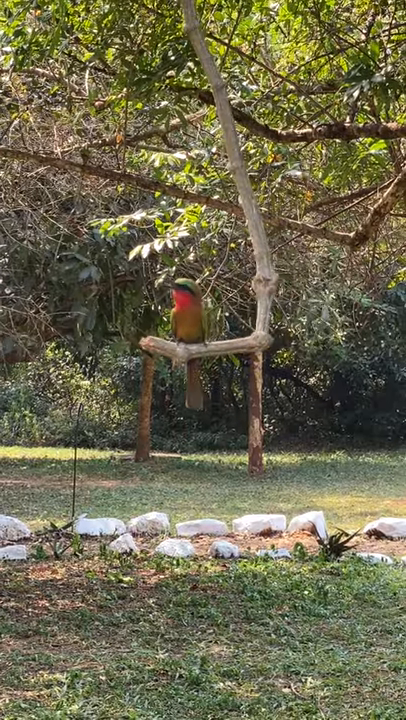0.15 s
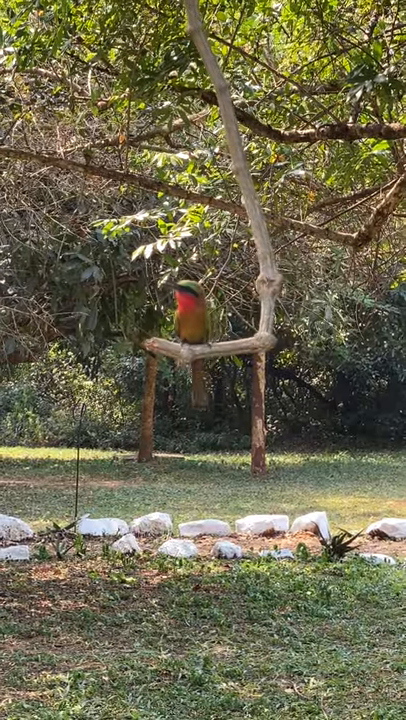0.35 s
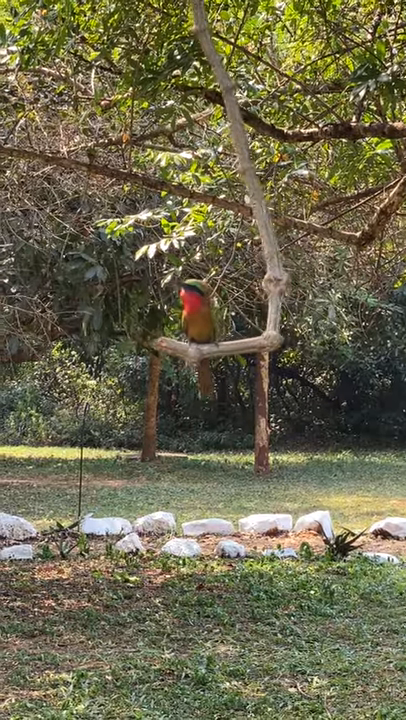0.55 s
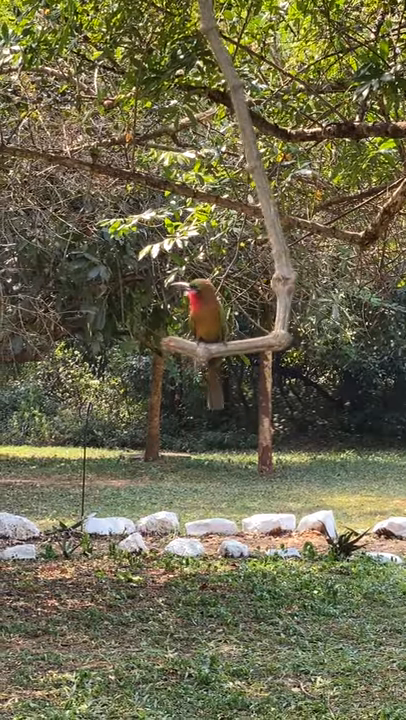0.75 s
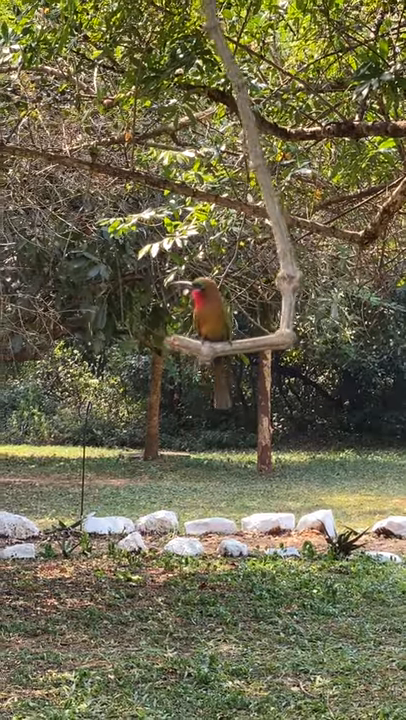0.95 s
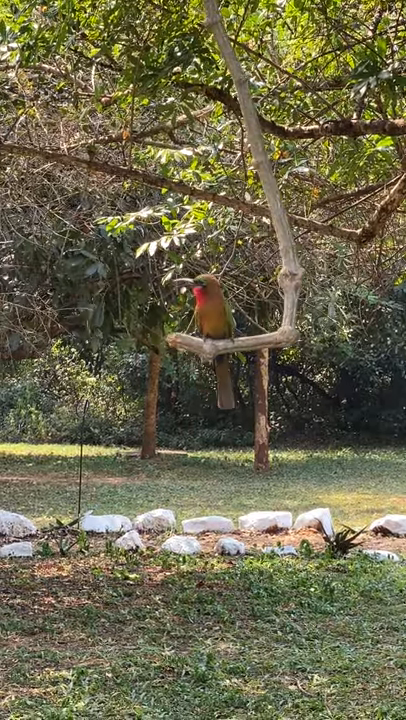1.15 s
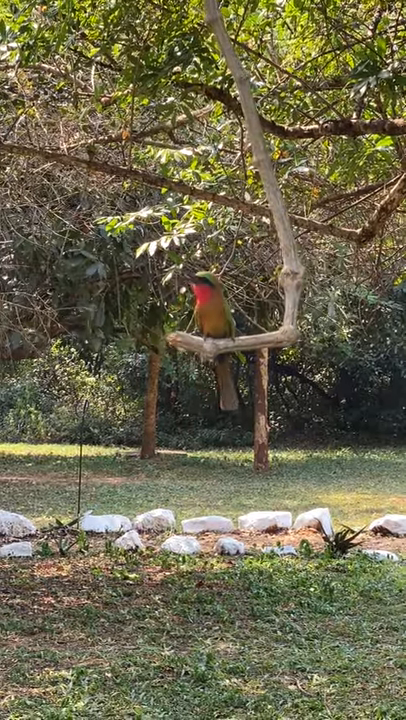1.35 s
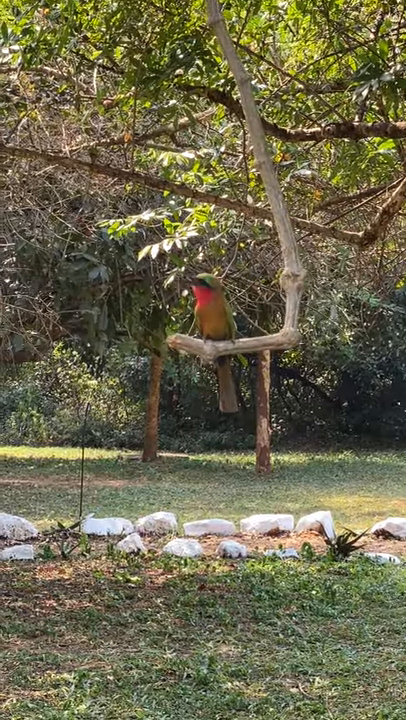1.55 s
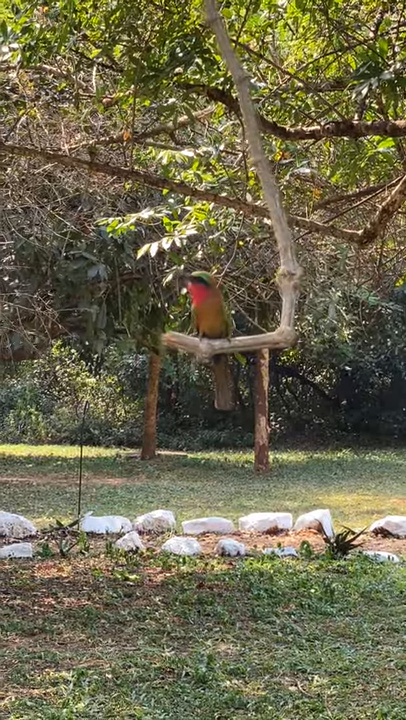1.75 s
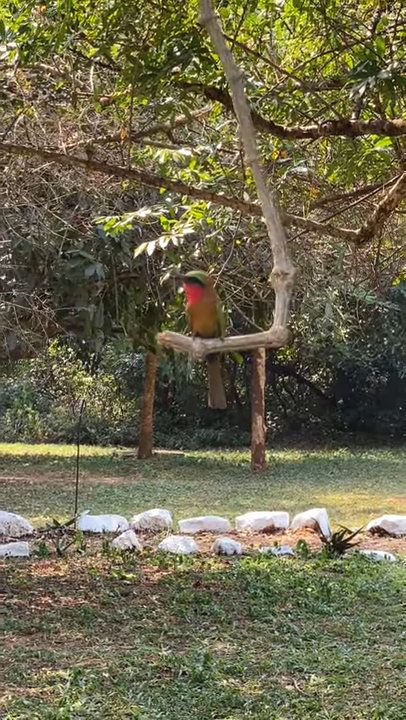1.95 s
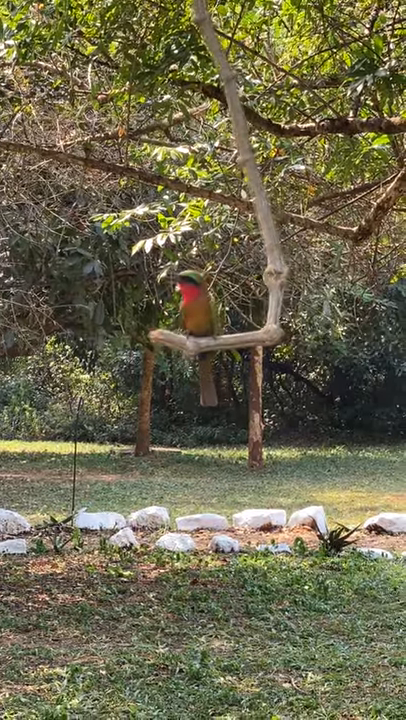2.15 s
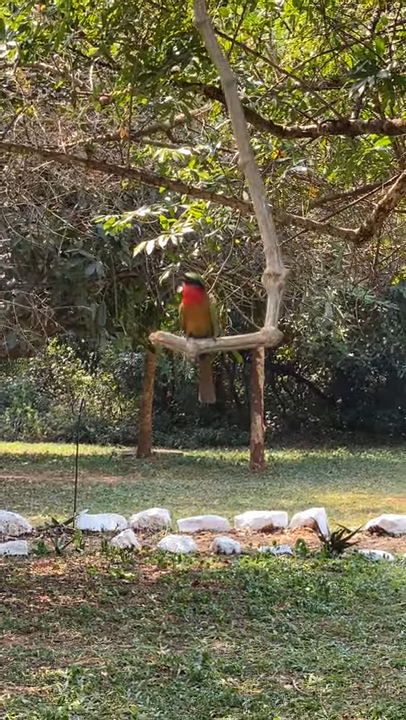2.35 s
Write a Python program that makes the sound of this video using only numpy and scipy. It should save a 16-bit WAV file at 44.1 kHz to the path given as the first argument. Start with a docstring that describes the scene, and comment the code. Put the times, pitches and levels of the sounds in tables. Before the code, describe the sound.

A perched bird calls in a quiet garden: from 0.4 to 0.55 s a rapid, burry four-part trill, then at about 1.75 s one softer, clean note arching up and down for a little over a tenth of a second. Faint far birds whistle and rattle throughout, busier after 1.4 s. Tiny clicks fall near 0.55, 1.07 and 1.39 s. Low idling engines throb under soft air noise; trees add short echoes.

```python
"""Garden with birds, heard by two microphone ports. Throughout, two idling engines drone as steady tones
that beat, under soft coloured noise, while far birds whistle and rattle: gliding tones blurred by echoes.
From 0.4 s a near perched bird gives a four-part trill, and from 1.75 s one arched note: harmonics coloured
by throat and beak, which the trill breaks into strong-weak pulses. Snaps, as damped clicks, fall at 0.55,
1.07 and 1.39 s. Trees scatter the bird sounds into random tails."""
import sys
import numpy as np
from scipy import signal
from scipy.fft import rfft, irfft, next_fast_len
from scipy.io import wavfile
from scipy.ndimage import uniform_filter1d

SR = 44100
rng = np.random.default_rng(int(sys.argv[2]) if len(sys.argv) > 2 else 0)


def put_to_file(sound):
    """Save the sound as 16-bit audio at rate SR, in the file named by the first command-line argument."""
    columns = np.atleast_2d(sound).T  # one column per channel
    safe = np.clip(columns, -1, 1)
    whole_steps = np.round(safe * 32767)
    wavfile.write(sys.argv[1], SR, whole_steps.astype(np.int16))


N = 110250
T = np.arange(N) / SR  # time in s


def gain_of(db):
    """Turns decibels into an amplitude factor."""
    return 10 ** (np.asarray(db) / 20)


def evened(x):
    """Scales a signal to rms 1."""
    return x / np.sqrt(np.mean(x ** 2) + 1e-20)


def read(points, hz):
    """Reads a curve of (f/Hz, value) points, with straight lines over log frequency."""
    f, value = np.transpose(points)
    return np.interp(np.log(hz + 1), np.log(f + 1), value)


def wobble(size):
    """Smooth random wavering of rms 1; a larger size (samples) wavers more slowly."""
    smoothed = uniform_filter1d(rng.standard_normal(N), size)
    return evened(uniform_filter1d(smoothed, size))


def noise(spectrum, patchy_db):
    """Coloured noise of rms 1, whose level drifts in patches over time and frequency."""
    frames, hz = N // 256 + 5, np.fft.rfftfreq(1024, 1 / SR)
    real, imaginary, patches = rng.standard_normal((frames, 513, 3)).T
    patches = uniform_filter1d(patches, 8, 0)  # smooth over frequency
    patches = evened(uniform_filter1d(patches, 14, 1))  # smooth over time
    level_db = read(spectrum, hz)[:, None] + patchy_db * patches
    grid = (real + 1j * imaginary) * gain_of(level_db)
    return evened(signal.istft(grid, nperseg=1024, noverlap=768)[1][:N])


def ports(x):
    """Makes two channels by turning the phase of each frequency apart between the ports."""
    # Phase by which left leads right: (f/Hz, phase/rad)
    port_phase = [(100, -3), (1500, 0.16), (2700, 0.58), (4100, 0.86), (4500, 1.5), (6000, 1.34),
                  (7400, 3.5), (8100, 3), (8500, np.pi), (11700, np.pi), (13300, 4.5), (15000, 5)]
    size = next_fast_len(N + 2048)
    half_turn = read(port_phase, np.fft.rfftfreq(size, 1 / SR)) / 2
    turns = np.exp(1j * np.array([half_turn, -half_turn]))
    return irfft(rfft(x, size) * turns, size)[:, :N]


def echoes(x, t60, gap_s, treble_share=0.68):
    """Scatter from trees: a dying random tail, mostly alike in both ports; its treble dies sooner."""
    treble_hz, fade_in_s = 4500, 0.0045
    differing, differing_top_hz = 0.45, 7000  # amplitude share that differs between ports, and its top
    t = np.arange(SR) / SR
    tails = rng.standard_normal((3, SR))
    low = signal.sosfiltfilt(signal.butter(N=2, Wn=treble_hz, fs=SR, output='sos'), tails)
    low_tail = low * gain_of(-60 * t / t60)
    treble_tail = (tails - low) * gain_of(-60 * t / t60 / treble_share)
    tails = (low_tail + treble_tail) * np.clip((t - gap_s) / fade_in_s, 0, 1)
    wet = signal.fftconvolve(x[None], tails / np.linalg.norm(tails[0]), axes=1)[:, :N]
    top_cut = signal.butter(N=6, Wn=differing_top_hz, fs=SR, output='sos')
    alike = np.sqrt(1 - differing ** 2) * ports(wet[0])
    return alike + differing * signal.sosfilt(top_cut, wet[1:])


def air():
    """Soft noise, the same in both ports."""
    # Colour of the noise: (f/Hz, relative level per Hz/dB)
    air_colour = [(25, -28.5), (45, -13.5), (77, -7.5), (100, -18.5), (130, -17.5), (194, -18.5),
                  (230, -25), (437, -27.5), (739, -34), (1630, -40), (2170, -43), (2600, -49), (3500, -55),
                  (5000, -63.5), (7500, -68), (9000, -77.5), (16000, -83.5)]
    return gain_of(-59.5) * noise(air_colour, patchy_db=0.5)


def hiss():
    """Soft noise, opposite in the two ports."""
    # Colour of the noise: (f/Hz, relative level/dB)
    hiss_colour = [(18, -73), (30, -49), (124, -5.5), (210, -2), (239, -10.5), (311, -0.5), (512, 2),
                   (1900, -16), (2230, -14), (3300, -38.5), (5030, -26.5), (5440, -27.5), (16000, -38)]
    one_side = gain_of(-72) * noise(hiss_colour, patchy_db=1.0)
    return np.array([one_side, -one_side])


def engines():
    """Steady low tones of two idling engines, which beat where they lie close, and a faint fuzzy whine."""
    # First engine, tones at multiples of its cycle rate: (multiple, mean level/dB rms)
    first_engine = [(3, -57.5), (4, -72), (5, -79), (6, -53), (7, -63), (8, -73.5), (10, -71.5), (11, -78),
                    (12, -70), (16, -69.5)]
    # Second engine: (f/Hz, mean level/dB rms)
    second_engine = [(52.0, -64), (75.8, -56)]
    cycle_hz, waver_db = 11.8, 1.5
    together_s = 1.005  # the moment at which all engine tones are in step
    whine_hz, whine_width_hz, whine_db = 1603, 35, -79  # the width is approximate
    tones = [(k * cycle_hz, db) for k, db in first_engine] + second_engine
    drone = np.zeros(N)
    for hz, db in tones:
        level = gain_of(db + waver_db * wobble(size=5000))
        drone += level * np.cos(2 * np.pi * hz * (T - together_s))
    # Two waves a quarter turn apart, each wavering at random, blur the whine
    whine = np.zeros(N)
    for wave in (np.sin, np.cos):
        whine += wobble(size=int(SR / whine_width_hz / 3)) * wave(2 * np.pi * whine_hz * T)
    return np.sqrt(2) * drone + gain_of(whine_db) * whine


def far_birds():
    """Thin gliding whistles at a distance: row 0 is the direct sound, row 1 feeds the echoes."""
    # Calls that glide to a turning pitch, then on to an end pitch; levels are those before the second glide:
    # (t/s, first glide/s, second glide/s, start f/Hz, turning f/Hz, end f/Hz, direct level/dB, echo level/dB)
    far_calls = [(0, .035, .01, 5300, 6050, 5500, -74, -82), (0, 0.033, .03, 6850, 7200, 6900, -81, -88),
                 (.3, .03, .06, 2150, 2320, 2200, -78, -76), (1.04, .02, .085, 2400, 2450, 1750, -79, -75),
                 (1.01, .03, .05, 1620, 1720, 1670, -76, -78),
                 (1.563, .012, .06, 3350, 3550, 3350, -67, -67),
                 (.29, .03, .04, 2700, 2775, 2750, -83.5, -84.5),
                 (.68, .03, .125, 4250, 4530, 4150, -77, -77), (.21, .01, .075, 2400, 2400, 1980, -78, -82),
                 (1.156, 0.029, 0.043, 6500, 7000, 5160, -84, -76),
                 (1.2, .02, 0.27, 1500, 1502, 944, -76, -76),
                 (1.304, 0.028, 0.031, 3230, 3360, 1975, -82, -73),
                 (1.368, .05, .032, 5120, 5460, 3140, -62, -64.5),
                 (1.385, .045, 0.038, 7220, 7560, 5200, -74, -65),
                 (1.5, 0.012, .16, 2870, 2580, 1900, -63.5, -64),
                 (1.538, 0.0033, 0.021, 4000, 3900, 2600, -70, -65),
                 (1.49, 0.014, 0.023, 5200, 5300, 3500, -87, -73.5),
                 (1.791, 0.025, 0.051, 6300, 6640, 4800, -74, -64.5),
                 (2.155, 0.02, 0.05, 3900, 4050, 3950, -82, -82),
                 (1.572, 0.02, .04, 6600, 6950, 6300, -90, -76),
                 (1.904, 0.0097, 0.065, 4360, 4500, 4210, -72, -71),
                 (1.98, 0.036, 0.041, 6500, 6780, 4700, -80, -69),
                 (2.225, .06, .027, 6290, 6980, 3800, -75, -66),
                 (2.35, 0.037, 0.063, 1555, 1666, 1684, -76, -87),
                 (2.37, .05, 0.023, 2590, 3050, 3030, -80, -79.5),
                 (2.472, 0.042, .01, 3410, 4150, 4200, -73.5, -73),
                 (2.478, 0.035, .01, 2400, 3125, 3100, -70.5, -72.5),
                 (2.47, 0.033, .01, 1790, 2120, 2100, -73, -77),
                 (1.93, .03, .03, 387, 397.6, 397, -63, -77),
                 (2.119, 0.024, 0.035, 492, 509, 504, -64, -73),
                 (2.26, 0.033, 0.07, 420, 400, 338, -64, -74)]
    edge_s = .006  # fade-out time; the fade-in takes twice as long
    fall_db = -4  # weakening over the second glide
    sweep_full_db, sweep_hz_per_s = -12, 40000  # quick falls weaken the direct sound further
    warble = .03  # share of pitch by which a fully blurred call sags at random (rms)
    flutter = 0.5  # from leaves and moving air, more where echoes outweigh the direct sound
    out = np.zeros((2, N))
    for start, rise, fall, from_hz, top_hz, to_hz, direct_db, echo_db in far_calls:
        t = T - start
        up, down = np.clip(t / rise, 0, 1), np.clip((t - rise) / fall, 0, 1)
        hz = from_hz + (top_hz - from_hz) * np.sin(np.pi / 2 * up) + (to_hz - top_hz) * down
        blur = min(flutter * gain_of(echo_db - direct_db), 1)
        hz = hz * (1 - warble * blur * abs(wobble(size=250)))
        edges = np.clip(np.minimum(t / 2, rise + fall - t) / edge_s, 0, 1)
        shape = gain_of(fall_db * down) * edges * (1 + blur * wobble(size=170))
        quickness = np.tanh((top_hz - to_hz) / fall / sweep_hz_per_s)
        sweep_db = sweep_full_db * quickness * np.sqrt(down)
        levels = gain_of([direct_db + sweep_db, echo_db + 0 * down])
        out += levels * np.sqrt(2) * shape * np.sin(2 * np.pi * np.cumsum(hz) / SR)
    return out


def rattles():
    """Quick runs of chips at a distance, each chip falling in pitch; rows as for the far birds."""
    # One list for each run: (t/s, f at the start of a chip/Hz, peak level of direct sound/dB)
    runs = [
        [(1.98, 3200, -71.5), (2.01, 3450, -58.5), (2.1, 3400, -67), (2.2, 3050, -68.5), (2.3, 2600, -79.5),
         (2.36, 2300, -76)],
        [(2.1, 2300, -80), (2.16, 2100, -75.5), (2.25, 1900, -71), (2.33, 1800, -82)],
        [(1.04, 2500, -79), (1.1, 2600, -73), (1.17, 2200, -80)],
        [(1.54, 3900, -72), (1.6, 3800, -70), (1.68, 3500, -81.5), (1.74, 3300, -84)],
    ]
    chips_per_s, chip_drop, echo_boost_db = 53, .35, 4  # the drop is a share of the pitch
    out = np.zeros(N)
    for rows in runs:
        s, top_hz, db = np.transpose(rows)
        rate = chips_per_s * (1 + 0.12 * wobble(size=900))
        progress = (np.cumsum(rate) / SR) % 1  # from 0 to 1 within each chip
        hz = np.interp(T, s, top_hz) * (1 - chip_drop * progress)
        chips = np.sin(np.pi * progress) * np.sin(2 * np.pi * np.cumsum(hz) / SR)
        out += chips * gain_of(np.interp(T, s, db, -200, -200))
    return gain_of([[0], [echo_boost_db]]) * out


def snaps():
    """Short clicks: tones that swell and die at once, sooner when wider; rows as for the far birds."""
    # Clicks: (t/s, f/Hz, width/Hz, direct level of the envelope peak/dB, echo level of it/dB)
    clicks = [(1.073, 6650, 4300, -46.5, -50), (.553, 880, 160, -57.5, -75), (1.39, 7600, 1500, -72, -60)]
    out = np.zeros((2, N))
    for s, hz, width, direct_db, echo_db in clicks:
        u = np.maximum(T - s, 0) * np.pi * width
        envelope = u ** 2 * np.exp(2 - u) / 4
        out += gain_of([[direct_db], [echo_db]]) * envelope * np.sin(2 * np.pi * hz * (T - s))
    return out


def garden(near):
    """Echoes of the near bird: a short early scatter and a weaker, longer late one."""
    early = gain_of(-16) * echoes(near, t60=0.18, gap_s=0.002)
    return early + gain_of(-26.5) * echoes(near, t60=0.47, gap_s=.03)


def bird(rows, tilt_db, glide_db, dip_hz, dip_end_s):
    """A stack of harmonics through the throat; half-pitch lines and breath grow in the breaks."""
    # Colour of throat and beak: (f/Hz, gain/dB)
    throat = [(600, -40.5), (1000, -5.5), (1450, -10), (2200, -4), (2900, -2), (3700, -2.5), (4400, -9),
              (5200, -19), (6000, -24.5), (7400, -28), (8800, -34), (10400, -36.5), (12000, -54),
              (13400, -40), (14600, -30), (15300, -40), (16000, -64)]
    jitter, break_jitter = .004, .018  # rms share of pitch, and what a full break adds
    breathy_db, break_breathy_db, breath_tilt_db = -30, -13, 28  # the tilt lifts breath in the treble
    bright_hz = 4300  # tilts start here, in dB per octave
    glide_hz_per_s = 12000  # the voice changes brightness while the pitch moves this fast
    lag_rad = .2  # phase lag, times the square of the harmonic number
    dip_width_hz, dip_db = 300, -27  # hollow in the colour, set by the beak

    s, hz, db, half = np.transpose(rows)
    hz, db, half = (uniform_filter1d(np.interp(T, s, c), 40) for c in (hz, db, half))
    glide_speed = abs(uniform_filter1d(np.gradient(hz), 150)) * SR
    tilt_db = tilt_db + glide_db * np.tanh(glide_speed / glide_hz_per_s)
    hz = hz * (1 + (jitter + break_jitter * half) * wobble(size=30))
    hollow_db = dip_db * np.clip((dip_end_s - T) / .01, .3, 1)
    turn, voice = np.pi * np.cumsum(hz) / SR, np.zeros(N)  # phase of the half-pitch line
    for k in range(1, 26):  # odd k are half-pitch lines, even k the harmonics
        line_hz = hz * k / 2
        octaves = np.log2(np.maximum(line_hz / bright_hz, 1))
        if k % 2:
            share, breath_share = half, half
        else:
            share, breath_share = 1 - (.4 if k == 2 else .8) * half, 1
        breath_db = breathy_db + (break_breathy_db - breathy_db) * half
        breath_db = breath_db + breath_tilt_db * (1 - half) * np.sqrt(np.minimum(octaves, 1))
        breath = gain_of(breath_db) * wobble(size=24)
        wave = np.cos(k * turn - lag_rad * k * k / 4) * (line_hz < 17000)
        line = (share + breath * breath_share) * wave
        hollow = hollow_db * np.exp(-((line_hz - dip_hz) / dip_width_hz) ** 2)
        voice -= gain_of(read(throat, line_hz) + tilt_db * octaves + hollow) * line
    return np.sqrt(2) * voice * gain_of(db) * (T > s[0]) * (T < s[-1])


def trill():
    """Four-part trill of the near bird; each part ends in a break into strong-weak pulses."""
    # Path of the voice: (t/s, f/Hz, level before the throat/dB, share of half-pitch lines/0-1)
    trill_path = [(.392, 1246, -73.5, 0), (.4005, 1302, -63, 0.1), (.402, 1247, -39, 0.16),
                  (.409, 1387, -32.5, 0), (.416, 1495, -32.5, 0), (.418, 1472, -39, .9),
                  (.4245, 1410, -35.5, 0.7), (.426, 1350, -39, 0), (.430, 1456, -31, 0),
                  (.435, 1528, -29, 0.07), (.451, 1519, -29.5, 0), (.453, 1470, -37.5, .9),
                  (.460, 1540, -39, .8), (.463, 1455, -52.5, .5), (.465, 1258, -37.5, 0.02),
                  (.469, 1396, -31, 0.11), (.475, 1452, -31, 0), (.490, 1470, -32, 0),
                  (.493, 1480, -40.5, 0.7), (.499, 1300, -45.5, 0.5), (.504, 1363, -51, 0.4),
                  (.506, 1146, -38.5, 0.3), (.510, 1311, -37, 0), (.515, 1396, -32, 0),
                  (.522, 1374, -33.5, 0.05), (.533, 1333, -39, 0), (.538, 1274, -50, 0.6),
                  (.546, 1320, -80, .3)]
    # The end of the hollow lies after the trill, so it stays throughout
    return bird(trill_path, tilt_db=-4, glide_db=9.5, dip_hz=6200, dip_end_s=1)


def arched_note():
    """One note of the near bird that rises and falls in pitch, with no breaks."""
    # Path of the voice: (t/s, f/Hz, level before the throat/dB)
    arch_path = [(1.747, 706.4, -90), (1.752, 785, -53), (1.76, 929, -48), (1.772, 1083, -41),
                 (1.79, 1240, -37.5), (1.808, 1317, -35), (1.826, 1350, -33), (1.844, 1321, -36.5),
                 (1.858, 1271, -35.5), (1.868, 1131, -46.5), (1.874, 980, -59.5), (1.877, 904, -85)]
    path = [(*row, 0) for row in arch_path]  # no half-pitch lines
    # The hollow mostly fills near the crest
    return bird(path, tilt_db=-9.5, glide_db=0.5, dip_hz=5200, dip_end_s=1.815)


def scene():
    """Adds the background, the far sounds and the near bird with their echoes, in two channels."""
    near = trill() + arched_note()
    far, far_wet = far_birds() + rattles() + snaps()
    far_echoes = echoes(far_wet, t60=0.42, gap_s=0.0021, treble_share=.9)
    background = engines() + air() + hiss()
    return ports(near + far) + garden(near) + far_echoes + background


def record(dry):
    """Band limit of the recorder: a steep low-pass at 16 kHz."""
    low_pass = signal.firwin(511, 16000, window=("kaiser", 9), fs=SR)
    return signal.oaconvolve(dry, low_pass[None], "same")


dry = scene()
out = record(dry)
put_to_file(out)
```